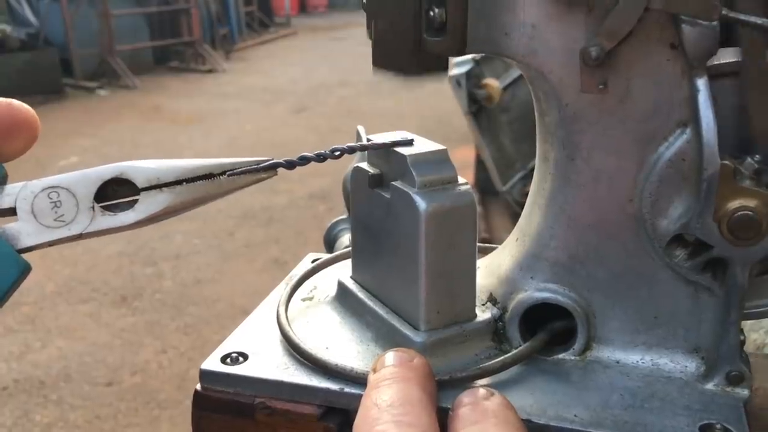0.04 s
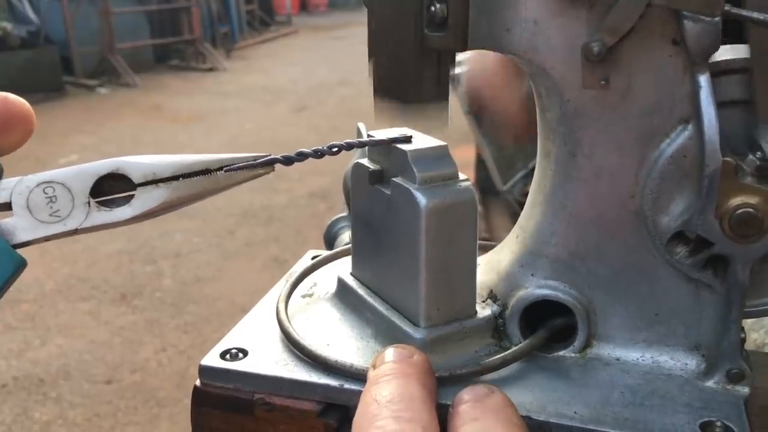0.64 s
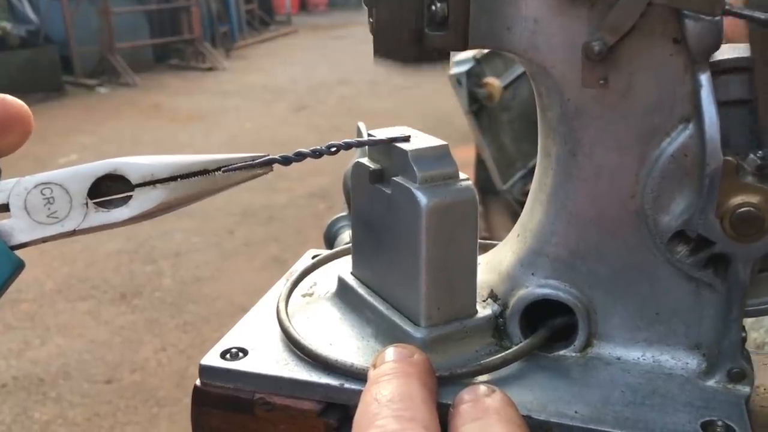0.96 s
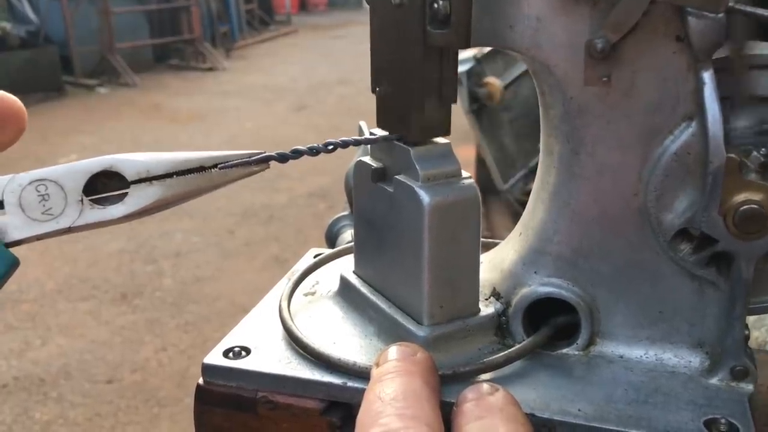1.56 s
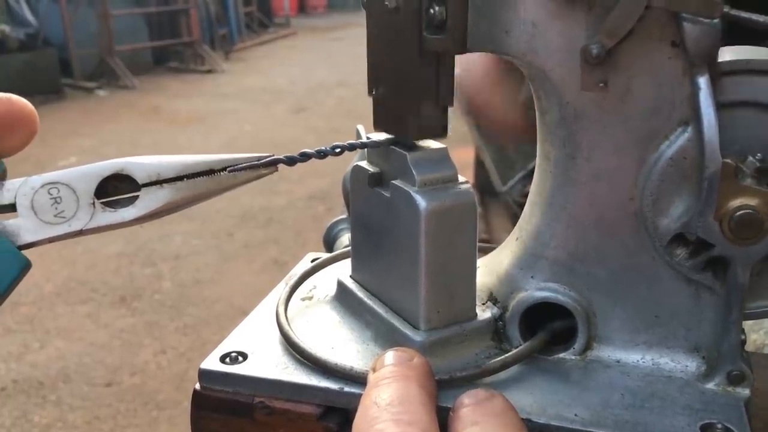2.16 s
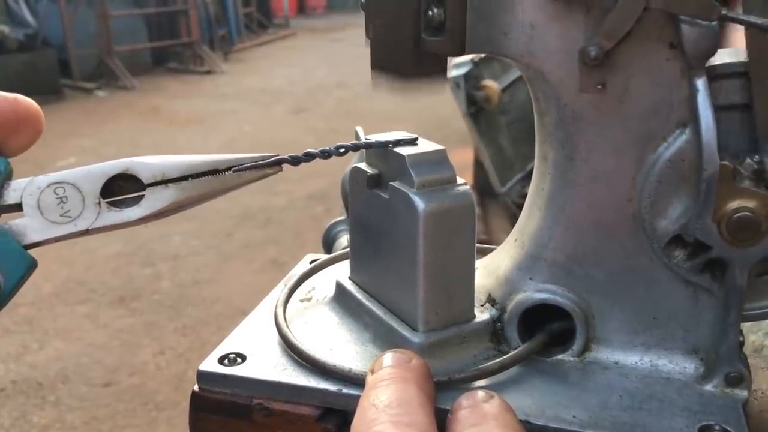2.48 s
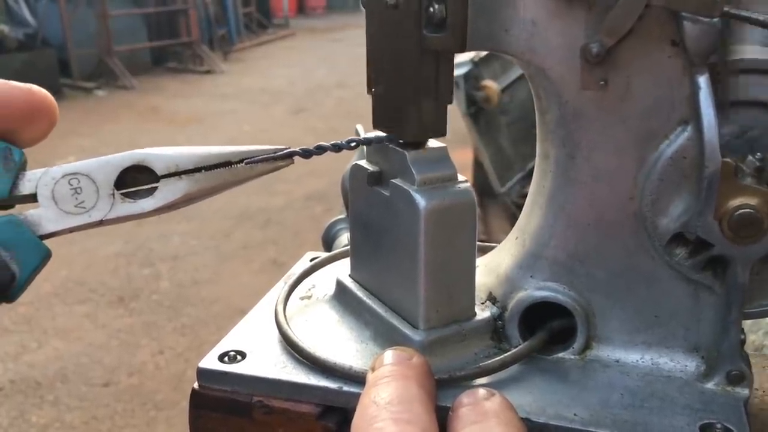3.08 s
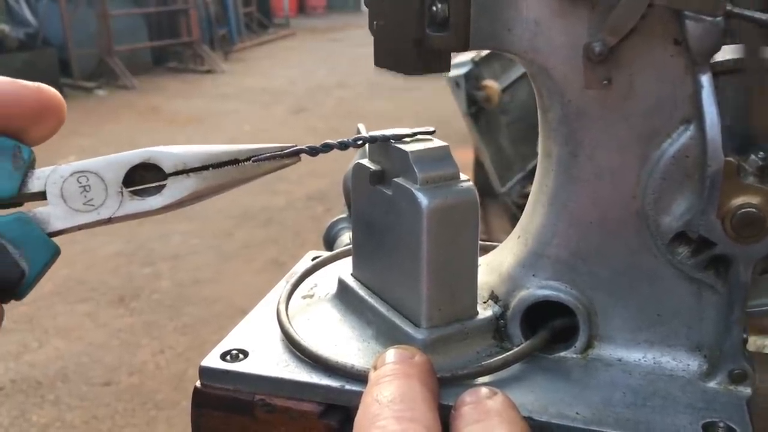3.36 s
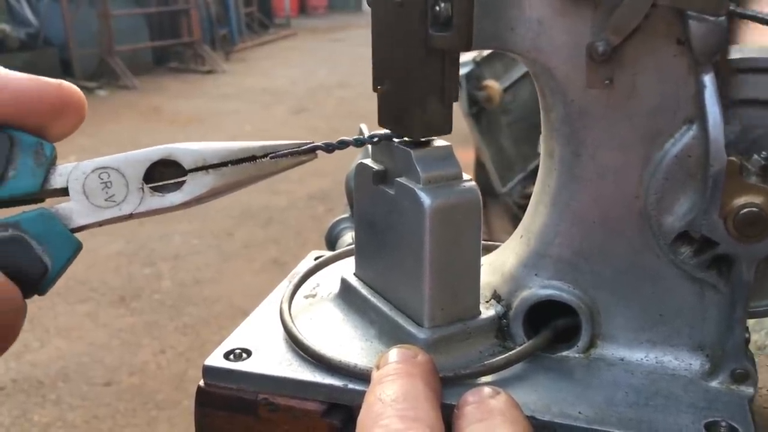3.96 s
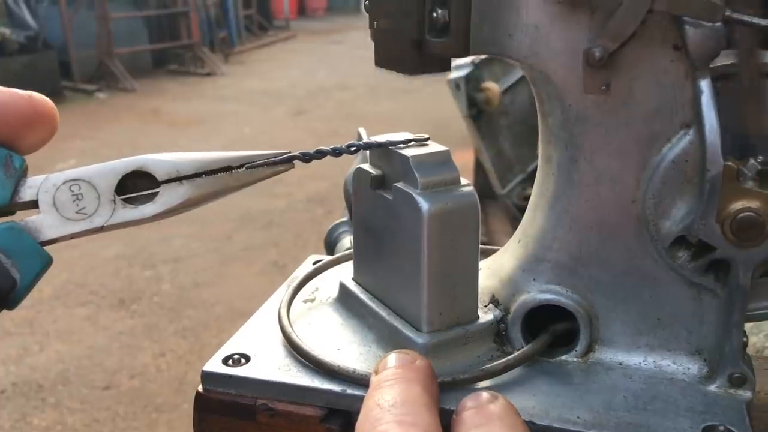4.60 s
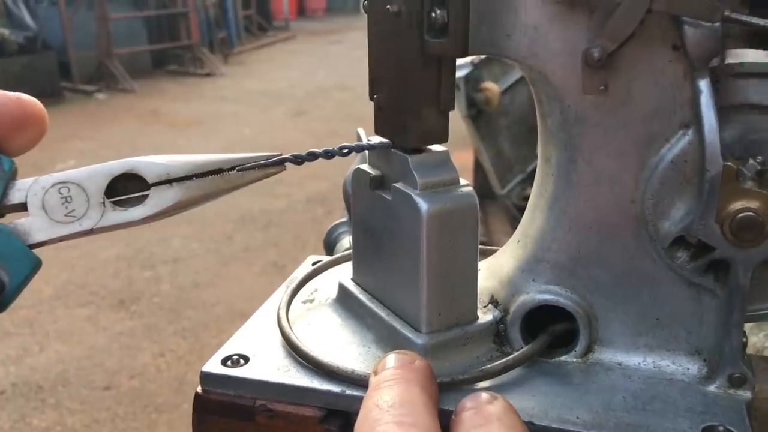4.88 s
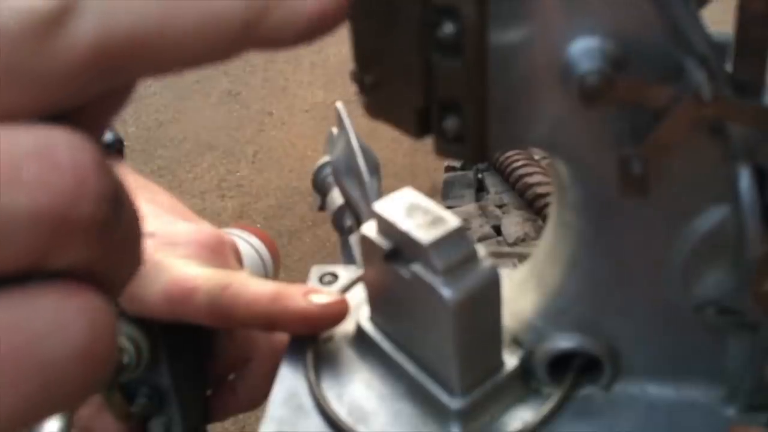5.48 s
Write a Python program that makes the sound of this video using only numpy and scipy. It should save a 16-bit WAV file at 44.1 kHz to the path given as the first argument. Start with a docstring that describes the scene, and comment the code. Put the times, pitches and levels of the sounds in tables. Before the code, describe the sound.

A small hand-cranked power hammer pounds a thin steel rod on its anvil, five to six even blows a second. Each blow gives a short metallic clank, a clatter of loose joints and a low thump through the workbench. Between blows, gears rumble softly and sliding parts rub, squeak and tick. After about five seconds the sound cuts off abruptly, leaving a very quiet, dull room with one faint rustle.

```python
"""From the start, a tiny hand-cranked power hammer on a workbench forges a thin steel rod, five to six blows a
second. Gears rumble as they pull down the ram, the moving hammer head. It lands, rings the anvil, shakes the
loose joints and thumps the bench, which booms on. Between blows, sliding parts rub and squeak and loose ones
tick. Just after five seconds the sound breaks off and the scene changes to a very quiet, dull background with a
deep low rumble and one faint rustle."""
import sys
import numpy as np
from scipy import signal
from scipy.fft import rfft, irfft
from scipy.io import wavfile

SR = 44100
rng = np.random.default_rng(int(sys.argv[2]) if len(sys.argv) > 2 else 0)


def output_pcm(signal):
    """Save a mono or channel-first signal as 16-bit PCM at the path in sys.argv[1].

    Samples are clipped to [-1, 1] before scaling.
    """
    pcm = np.clip(np.atleast_2d(signal).T, -1, 1) * 32767
    wavfile.write(sys.argv[1], SR, np.round(pcm).astype(np.int16))


N = 244259
TIME = np.arange(N) / SR
STOP_S, CUTOFF_HZ = 5.158, 16050

# Levels in the tables are relative. "fade" (t60 in the code) is the time a sound takes to drop by 60 dB.
# Blows of the ram: t/s, ring/dB, chatter/dB, thump/dB, boom/Hz, boom/dB, downward rub/dB, rebound rub/dB
BLOWS = [(0.0935, 1, 0.5, -1.0, 237.0, 2.0, -49.0, -41.0),
         (0.2844, -0.5, -1.0, -0.5, 232.0, -1.0, -56.0, -36.0),
         (0.471, 1, -0.5, -0.5, 208.0, 1.0, -38.0, -50.0),
         (0.6651, 1.0, 0.5, -1.0, 232.0, 0.0, -37.0, -47.0),
         (0.8482, 0.0, -0.5, -0.5, 236.0, 1.0, -40.0, -47.0),
         (1.0278, 0.0, -1.0, -0.0, 238.0, -3.0, -39.0, -44.0),
         (1.2145, 3, -1.0, -1.0, 229.0, -1.0, -38.0, -49.0),
         (1.395, 2.5, 1.0, -0.5, 230.0, -3.0, -39.0, -51.0),
         (1.5653, 1, -1.0, -1.5, 232.0, -6.0, -45.0, -43.0),
         (1.7538, 1, 0.0, -0.5, 235.0, 4.0, -58.0, -39.0),
         (1.9508, 1.5, 1.5, -1, 231.0, -5.0, -38.0, -50.0),
         (2.1278, 1.0, 0.5, -1.0, 225.0, -1.0, -58.0, -38.0),
         (2.327, 1.0, 0.5, 0, 235.0, 4.0, -54.0, -34.0), (2.519, 3.0, 0.0, 0, 239.0, -3.0, -37.0, -49.0),
         (2.7088, 3.5, 1.5, 0.0, 233.0, 2.0, -38.0, -37.0), (2.9029, 1, 0.0, 0.5, 231.0, 4.0, -37.0, -48.0),
         (3.0784, 1.5, -1.0, -0.0, 226.0, -5.0, -35.0, -48.0),
         (3.251, 2.0, -0.5, -1.0, 240.0, -6.0, -39.0, -54.0),
         (3.432, 1.5, -0.5, 0.5, 233.0, -3.0, -42.0, -43.0),
         (3.6053, 2.0, 1, 0.5, 237.0, 1.0, -39.0, -41.0), (3.7871, 3, 0.5, 1.0, 227.0, 3.0, -43.0, -36.0),
         (3.9705, 1.5, -0.5, 1.5, 236.0, 5.0, -38.0, -45.0), (4.1423, 1, 0.5, 3, 206.0, 1.0, -45.0, -40.0),
         (4.333, 3.5, 1.0, 1, 234.0, 3.0, -50.0, -45.0), (4.5047, 2.5, 0.0, 0.5, 236.0, 3.0, -35.0, -51.0),
         (4.6723, 3.5, 0.5, -1.5, 234.0, 0.0, -45.0, -42.0),
         (4.8611, 3, 1.5, -0.5, 237.0, 2.0, -55.0, -36.0), (5.042, 2, 1.5, 1.0, 207.0, 1.0, -35.0, -44.0)]
# Tones of the anvil, rod and metal body: f/Hz, level/dB, fade/s, swell/s, phase scatter/rad
ANVIL_TONES = [(678.4, -45, 0.17, 0.0017, 0.35), (943.5, -22, 0.025, 0.0015, 0.36),
               (1040, -11, 0.023, 0.0023, .2), (1409.4, -23, 0.056, 0.0044, 2.2),
               (1503, -23.5, 0.06, 0.0062, 1.2), (1660, -54.5, 0.0067, .0005, 0.46),
               (2031, -16.5, 0.013, 0.00029, 0.31), (2236, -31.5, 0.044, 0.00041, 0.75),
               (2345, -39, 0.062, 0.00022, 1.9), (2773, -31, .025, 0.00083, .6),
               (3363, -22.5, 0.0061, 0.00013, .4), (4230, -52.5, 0.037, .001, 1.5),
               (5176, -31, 0.017, 0.0003, .5), (5790, -44.5, 0.015, 0.00073, 0.5),
               (6060, -36.5, 0.038, 0.00041, 0.78)]
# Tones of the bench: f/Hz, level/dB, fade/s, swell/s, level when the gears shake it/dB
BENCH_TONES = [(66.2, -34, 0.33, .007, -8.5), (94, -32.5, 0.09, 0.0017, -22),
               (123.9, -32, 0.21, 0.0069, -5), (181.2, -31.5, 0.12, 0.0036, -5.5),
               (202.2, -30.5, 0.23, .006, -4), (231.7, -42, 0.18, 0.027, 6), (274, -28, 0.18, 0.0066, -0.5),
               (311, -29, 0.13, 0.0063, 0.5), (374.4, -32, 0.16, 0.007, -13),
               (422.4, -33, 0.056, 0.0014, -20)]
# Tones of the frame and its links: f/Hz, width/Hz, level when jolted/dB, level when rubbed/dB
FRAME_TONES = [(500, 160, -1, -4), (719, 120, 2, 2), (1000, 85, 8, 10.5), (1140, 94, 2, 10),
               (1282, 53, 11, 8.5), (1498, 140, 8, 4), (1720, 99, 7, 3), (2006, 73, 6.5, 7),
               (2170, 190, 2.5, -2), (2443, 109, 6, 3), (2873, 190, 3, -1), (3290, 216, 1.5, -1),
               (3640, 187, 6.5, 3), (4115, 366, 5.5, -1.5), (5480, 610, -1.5, -6.5), (5960, 290, 2, -2.5),
               (6880, 1000, -3.5, -11.5), (8370, 600, -1, -10), (9640, 970, -2.5, -10.5),
               (11760, 720, -7.5, -10.5), (12420, 140, -11, -1), (13450, 640, 0.5, -26),
               (14780, 490, -6, -14), (15200, 630, -5, -16.5)]
# The jolt of a blow running through the loose joints: delay/s, level/dB, fade/s
JOLTS = [(0, -24, 0.012), (.003, -23, 0.028), (.006, -34.5, 0.031), (.009, -25.5, 0.025)]
# The crank scrapes once a turn, going over the top: middle t/s, half length/s, level/dB, treble offset/dB
CRANK_RUBS = [(0.014, 0.011, -48.5, -4.0), (0.257, 0.006, -40.5, -4.0), (0.424, 0.011, -39.5, -7.0),
              (0.618, 0.015, -39.5, -9.0), (0.814, 0.019, -37.5, -9.0), (0.966, 0.026, -38.5, -8.0),
              (1.137, 0.029, -46.5, -7.0), (1.34, 0.02, -42.5, -7.0), (1.498, 0.029, -38.5, -7.0),
              (1.66, 0.021, -46.5, -9.0), (1.905, 0.012, -36.5, -9.0), (2.078, 0.028, -45.5, -11.0),
              (2.287, 0.022, -41.5, -6.0), (2.471, 0.012, -33.5, -11.0), (2.673, 0.012, -40.5, -11.0),
              (2.864, 0.012, -37.5, -5.0), (3.019, 0.015, -35.5, -9.0), (3.207, 0.011, -36.5, -8.0),
              (3.394, 0.013, -34.5, -9.0), (3.541, 0.019, -35.5, -8.0), (3.705, 0.019, -44.5, -5.0),
              (3.914, 0.008, -43.5, -10.0), (4.093, 0.026, -37.5, -9.0), (4.274, 0.043, -44.5, -7.0),
              (4.453, 0.015, -34.5, -10.0), (4.633, 0.049, -44.5, -10.0), (4.808, 0.027, -41.5, -6.0),
              (4.991, 0.011, -36.5, -9.0)]
# The ram rubs in its guide going down and bouncing back:
# delay after the blow/s, half length/s, treble offset/dB, squeak f/Hz, squeak share (0 to 1)
DOWNWARD_RUB = (.003, .021, -7, 3639.5, .1)
REBOUND_RUB = (.034, .021, -6.5, 1520, .18)
# Squeaks of a dry bearing or the ram guide: t/s, level/dB, f/Hz
SQUEAKS = [(.333, -38, 1560), (.421, -40, 3640), (.463, -38, 3700), (.814, -42, 1090), (.977, -39, 1160),
           (1.514, -34, 1140), (1.902, -42, 3530), (2.087, -42, 1040), (2.285, -40, 3550),
           (2.377, -37, 1560), (2.47, -39, 1000), (2.682, -39, 1120), (2.865, -35, 3600),
           (3.018, -42, 3860), (3.061, -36, 3660), (3.537, -38, 1170), (3.828, -38, 1500),
           (3.908, -40, 1040), (3.961, -37, 3600), (4.452, -37, 980), (4.99, -40, 3540)]
# The louder snaps of the loose joints: t/s, level/dB, f/Hz
LOUD_SNAPS = [(0.3336, -20.5, 12400), (0.7307, -32, 14800), (0.969, -26, 12500), (1.1164, -38, 12000),
              (1.4376, -30, 7460), (1.4601, -24.5, 14200), (2.1816, -25, 12300), (2.3605, -26, 12400),
              (3.312, -27, 14200), (3.483, -23, 14000), (4.0108, -31, 7400), (4.2105, -29.5, 7300),
              (4.238, -27, 14200), (4.2597, -28, 15200), (4.2913, -27, 8300), (4.4084, -29, 14200),
              (4.4897, -24, 14400), (4.5396, -30, 9700), (4.788, -27, 12400)]
# How much the loose pins and springs rattle: t/s, level/dB
RATTLE_LEVELS = [(0.0, -61), (0.8, -55), (1.9, -61), (2.3, -58), (2.58, -63), (3.4, -52), (3.89, -59),
                 (4.19, -50), (4.95, -56)]
# The faint background after the sound breaks off, from low to high pitch, with a deep rumble at the bottom:
# f/Hz, # level/dB
BACKGROUND_SPECTRUM = [(20, -4), (45, -16.5), (97, -31), (288, -33), (620, -51), (823, -44.5), (2080, -54.5),
                       (2500, -73), (3200, -110)]


def anvil():
    """The ram lands on the rod; the tones it sets ringing vary as the rod shifts."""
    ring_db = np.array(BLOWS)[:, 1]
    return sum((-1) ** k * struck_tone(ring_db + db, hz, t60, swell, scatter, vary_db=2.5, detune=.015)
               for k, (hz, db, t60, swell, scatter) in enumerate(ANVIL_TONES))


def bench_thump():
    """The bench takes up each blow a little late and answers with low tones."""
    thump_db = np.array(BLOWS)[:, 3]
    return sum((-1) ** k * struck_tone(thump_db + db, hz, t60, swell, hz / 600, vary_db=2, detune=.011)
               for k, (hz, db, t60, swell, _) in enumerate(BENCH_TONES))


def bench_boom(delay_s=.017, gain_db=-31.3, scatter=1.2):
    """The bench top springs back after each blow and hums on."""
    out, t = np.zeros(N), TIME[:SR // 2]
    shape = swell_and_fade(t, swell=.00405, t60=.21)
    for (s, _, _, _, hz, db, *_), phase in zip(BLOWS, rng.standard_normal(len(BLOWS))):
        wave = np.sin(2 * np.pi * hz * t + scatter * phase)
        add(out, s + delay_s, from_db(db + gain_db) * shape * wave)
    return out


def chatter(vary_db=.5):
    """Just after each blow the loose parts clash against the frame."""
    energy, t = np.zeros(N), TIME[:SR // 10]
    for s, _, chatter_db, *_ in BLOWS:
        for delay, jolt_db, t60 in JOLTS:
            late, loud = rng.standard_normal(2)
            jolt = from_db(chatter_db + jolt_db + vary_db * loud) * fade(t, t60)
            add(energy, s + delay * (1 + .15 * late), jolt ** 2)
    clashes = np.sqrt(energy) * contacts(per_s=16000, spread_db=2)
    return np.sqrt(energy.mean()) * jolted_frame(clashes)


def rubbing(squeak_q=21):
    """Steel slides on steel: a gritty rasp in the frame, a bright sizzle on top and a narrow squeak."""
    rasp_power = np.full(N, from_db(-55) ** 2)   # faint rubbing goes on all the time
    sizzle_power = np.full(N, from_db(-68.5) ** 2)
    squeaks = np.zeros(N)
    slips = stick_slip(per_s=520, slip_s=.0011, depth=.81)
    friction = slips * rng.standard_normal(N)
    for s, db, half_s, treble_db, hz, share in list_rubs():
        near = slice(max(int((s - 3 * half_s) * SR), 0), int((s + 3 * half_s) * SR))
        pressure = from_db(db) * np.exp(-.5 * np.abs((TIME[near] - s) / half_s) ** 3)   # holds, lets go
        rasp_power[near] += (1 - share) * pressure ** 2
        sizzle_power[near] += (pressure * from_db(treble_db)) ** 2
        squeaks[near] += np.sqrt(share) * pressure * resonate(friction[near], [(hz, hz / squeak_q, 0)])
    low_tones = [(hz, width, db) for hz, width, _, db in FRAME_TONES if hz < 4900]
    high_tones = [(hz, width, db) for hz, width, _, db in FRAME_TONES if hz >= 4900]
    rasp = resonate(slips * contacts(per_s=11000, spread_db=.55), low_tones)
    sizzle = resonate(slips * contacts(per_s=7800, spread_db=0), high_tones)
    sizzle += .4 * pings(per_s=2200, spread_db=.5, low_hz=5400, high_hz=15400, width_hz=140, count=18)
    sizzle = unit_level(sizzle) * stick_slip(per_s=230, slip_s=.0024, depth=.6)   # harder slips tick
    return (from_db(-1) * np.sqrt(rasp_power) * rasp
            + from_db(-2) * np.sqrt(sizzle_power) * sizzle
            + from_db(-1.5) * squeaks)


def list_rubs(pitch_scatter=.037):
    """Every rub and squeak: t/s, level/dB, half length/s, treble offset/dB, squeak f/Hz, squeak share."""
    rubs = [(s, db, half_s, treble_db, 1100, .1) for s, half_s, db, treble_db in CRANK_RUBS]
    for s, *_, downward_db, rebound_db in BLOWS:
        for db, (delay, *sound) in [(downward_db, DOWNWARD_RUB), (rebound_db, REBOUND_RUB)]:
            rubs.append((s + delay, db, *sound))
    pitches = 1 + pitch_scatter * rng.standard_normal(len(rubs))
    rubs = [(*rub, hz * pitch, share) for (*rub, hz, share), pitch in zip(rubs, pitches)]
    return rubs + [(s, db, .01, -20, hz, 1) for s, db, hz in SQUEAKS]


def stick_slip(per_s, slip_s, depth):
    """Sliding parts catch and slip in small jerks, which makes the loudness flutter."""
    slips = unit_level(pulses(per_s, spread_db=1.3, decay_s=slip_s))
    return unit_level(1 - depth + depth * 2 * np.tanh(slips / 2))


def joint_snaps(loud_gain_db=-7.5, ring_share=.8):
    """A loose joint snaps over with a bright click and a short ring. Smaller snaps come at random."""
    out, t = np.zeros(N), TIME[:SR // 20]
    snaps = [(s, db + loud_gain_db, hz) for s, db, hz in LOUD_SNAPS]
    small_per_s = 8 * from_db(rattle_db()) ** 2
    for s in TIME[rng.random(N) < small_per_s / SR]:
        loud, pitch = rng.uniform(-1.02, 1, 2)
        snaps.append((s, -44 + 3 * loud, 10000 + 5000 * abs(pitch)))
    for s, db, hz in snaps:
        click = unit_level(filtered(rng.standard_normal(len(t)), "band", [4500, 15000], order=1))
        ring = resonate(rng.standard_normal(len(t)), [(hz, 400, 0)])
        add(out, s, from_db(db) * fade(t, t60=.014) * unit_level(click + ring_share * ring))
    return out


def gears(lead_s=.025, pull_s=.022):
    """The gears rumble into the bench, hardest as they pull the ram down before a blow."""
    load = sum(np.exp(-((TIME - s + lead_s) / pull_s) ** 2) for s, *_ in BLOWS)
    tones = [(hz, np.log(1000) / (np.pi * t60), db) for hz, _, t60, _, db in BENCH_TONES]
    return from_db(-47 + 2.5 * load) * resonate(rng.standard_normal(N), tones)


def jingle():
    """Pins and springs tick faintly all through the stroke, in brief flurries and single high pings."""
    flurry = pulses(per_s=90, spread_db=4, decay_s=.00099)
    parts = flurry * pings(per_s=2000, spread_db=3, low_hz=5200, high_hz=15300, width_hz=270, count=14)
    frame = jolted_frame(flurry * rng.standard_normal(N))
    spring = resonate(flurry * rng.standard_normal(N), [(12400, 110, 0)])
    pins = pings(per_s=70, spread_db=5, low_hz=9300, high_hz=14000, width_hz=110, count=12)
    loudness = from_db(-56.5 + .4 * rattle_db())
    return loudness * (.49 * unit_level(parts) + .6 * frame + .38 * spring + .39 * pins)


def rattle_db():
    """How far the rattling is above or below its average at each moment."""
    db = np.interp(TIME, *np.transpose(RATTLE_LEVELS))
    return db - db.mean()


def background(rustle_s=5.245):
    """A dull, faint background noise with a deep low rumble and one soft rustle."""
    hz, db = np.transpose(BACKGROUND_SPECTRUM)
    colour = from_db(np.interp(np.log(np.fft.rfftfreq(N, 1 / SR) + 1), np.log(hz), db))
    air = irfft(rfft(rng.standard_normal(N)) * colour, N)
    air = filtered(air, "high", 18, order=2)
    rustle = filtered(rng.standard_normal(N), "band", [1300, 2350], order=6)
    rustle_shape = np.exp(-((TIME - rustle_s) / .026) ** 2)
    return from_db(-58.5) * unit_level(air) + from_db(-67.5) * unit_level(rustle) * rustle_shape


def struck_tone(levels_db, hz, t60, swell, scatter, vary_db, detune):
    """One tone rung by every blow, a little different in level, pitch and phase each time."""
    out, t = np.zeros(N), TIME[:int(t60 * SR)]
    shape = swell_and_fade(t, swell, t60)
    for (s, *_), db in zip(BLOWS, levels_db):
        loud, pitch, phase = rng.standard_normal(3)
        wave = np.sin(2 * np.pi * hz * (1 + detune * pitch) * t + scatter * phase)
        add(out, s, from_db(db + vary_db * loud) * shape * wave)
    return out


def jolted_frame(knocks):
    """Knocks make the frame ring at its own tones."""
    return resonate(knocks, [(hz, width, db) for hz, width, db, _ in FRAME_TONES])


def pings(per_s, spread_db, low_hz, high_hz, width_hz, count):
    """Each tiny contact rings one of many small steel parts, each with its own pitch."""
    hits = contacts(per_s, spread_db)
    part_hit = rng.integers(0, count, N)
    pitches = np.geomspace(low_hz, high_hz, count) * (1 + .017 * rng.standard_normal(count))
    return unit_level(sum(resonate(hits * (part_hit == k) + 1e-18, [(hz, width_hz, 0)])
                          for k, hz in enumerate(pitches)))


def contacts(per_s, spread_db):
    """Tiny metal contacts at random moments; more spread makes a few much harder than the rest."""
    sizes = from_db(spread_db * np.minimum(rng.exponential(1, N), 4)) * rng.choice([-1, 1], N)
    return sizes * (rng.random(N) < per_s / SR) + 1e-18


def pulses(per_s, spread_db, decay_s):
    """A level that jumps at each random contact and quickly falls back."""
    return signal.lfilter([1], [1, -np.exp(-1 / (decay_s * SR))], np.abs(contacts(per_s, spread_db)))


def resonate(x, tones):
    """Let x ring a set of tones (f/Hz, width/Hz, level/dB), added with alternating signs, at level 1."""
    out = 0
    for k, (hz, width, db) in enumerate(tones):
        r = np.exp(-np.pi * width / SR)
        poles = [1, -2 * r * np.cos(2 * np.pi * hz / SR), r * r]
        out = out + (-1) ** k * from_db(db) * (1 - r * r) / 2 * signal.lfilter([1, 0, -1], poles, x)
    return unit_level(out)


def filtered(x, kind, hz, order):
    """Keep the highs or a band of pitches; a higher order cuts more sharply."""
    return signal.sosfilt(signal.butter(order, hz, kind, fs=SR, output="sos"), x)


def swell_and_fade(t, swell, t60):
    """The loudness of a struck tone: it builds up, then dies away."""
    return fade(t, t60) * (1 - np.exp(-t / swell)) ** 2


def fade(t, t60):
    """Die away by 60 dB every t60 seconds."""
    return np.exp(-np.log(1000) * t / t60)


def from_db(db):
    """Turn decibels into a multiplier."""
    return 10 ** (np.asarray(db) / 20)


def unit_level(x):
    """Scale to an average (rms) level of 1."""
    return x / np.sqrt(np.mean(x ** 2) + 1e-20)


def add(track, s, sound):
    """Mix a sound into a track at s seconds."""
    start = max(round(s * SR), 0)
    track[start:start + len(sound)] += sound[:N - start]


def scene():
    """The machine runs until its sound breaks off and gives way to the quiet background."""
    machine = anvil() + bench_thump() + bench_boom() + chatter()
    machine += rubbing() + jingle() + gears() + joint_snaps()
    machine = filtered(machine, "high", 45, order=3)   # a small bench gives off no deep bass
    running = np.clip((STOP_S - TIME) / .002, 0, 1)
    return (machine * running + background() * (1 - running))[None]


def record(dry, ceiling=.29):
    """Round off the loudest peaks and cut the highest treble."""
    rounded = ceiling * np.tanh(dry / ceiling)
    return signal.sosfilt(signal.ellip(10, .1, 80, CUTOFF_HZ, fs=SR, output="sos"), rounded)


dry = scene()
out = record(dry)
output_pcm(out)
```